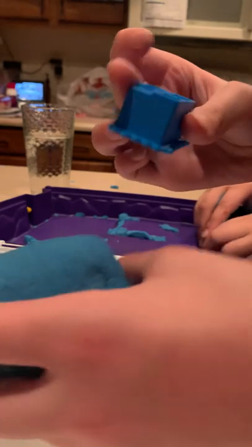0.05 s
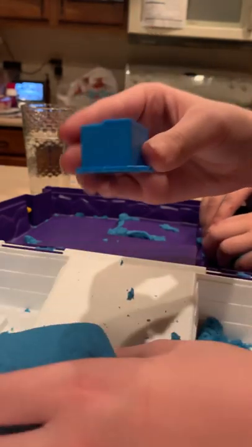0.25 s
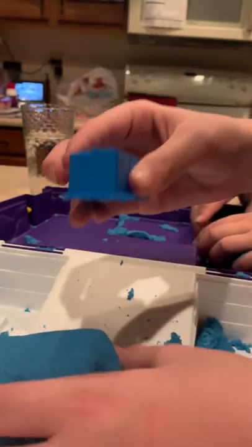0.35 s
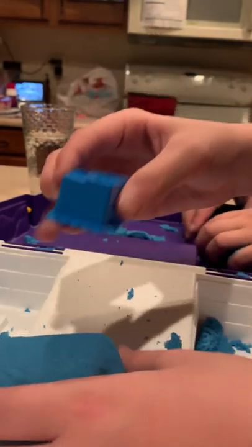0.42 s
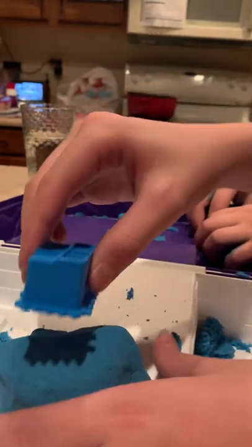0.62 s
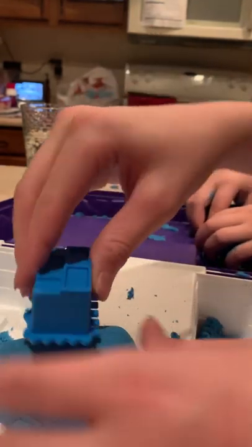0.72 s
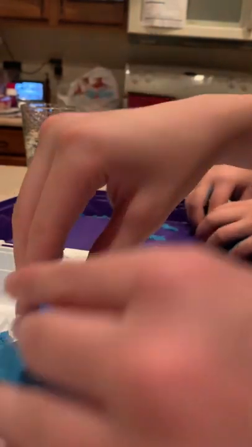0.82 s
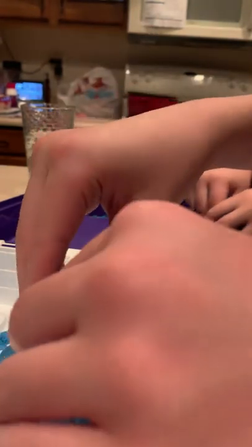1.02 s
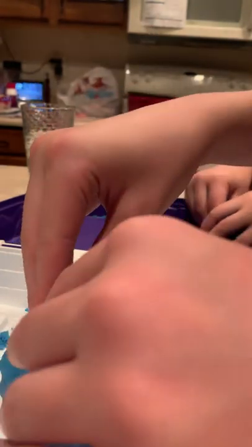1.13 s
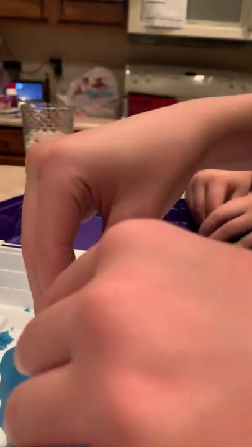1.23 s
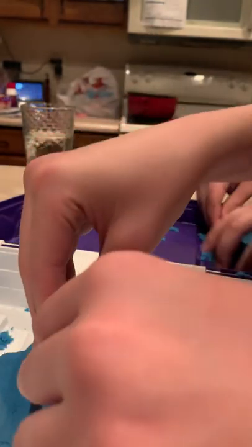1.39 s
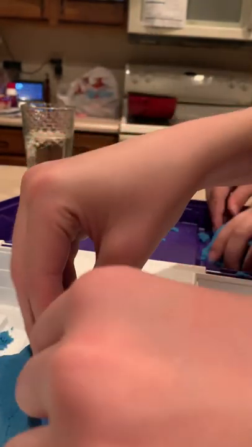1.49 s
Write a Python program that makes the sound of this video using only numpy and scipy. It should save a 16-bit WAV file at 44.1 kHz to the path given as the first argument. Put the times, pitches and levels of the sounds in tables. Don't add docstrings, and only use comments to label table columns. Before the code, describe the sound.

A hard, sharp knock on a plastic tray dominates at about 0.24 s, bright at first, then booming low through the table, with tiny rebounds and a short rattle until about 0.4 s. Before it, only a soft thump and faint sand rustle. Afterwards, quiet sand crunches and hisses, small mold taps and dry ticks near 0.5, 0.77, 0.85 and 1.33 s, rising slightly at the end, 1.55 s. Close, quiet room.

```python
import sys
import numpy as np
from scipy import signal
from scipy.fft import rfft, irfft
from scipy.io import wavfile
from scipy.ndimage import uniform_filter1d, minimum_filter1d

SR = 44100
rng = np.random.default_rng(int(sys.argv[2]) if len(sys.argv) > 2 else 0)


def dump(signal):
    limited = np.clip(np.atleast_2d(signal).T, -1, 1)
    pcm = np.round(limited * 32767).astype(np.int16)
    wavfile.write(sys.argv[1], SR, pcm)


def how_loud(loudness_db):
    steps = np.asarray(loudness_db, float) / 20
    return 10 ** steps


N = 68355


def in_time(rows):
    return np.interp(np.arange(N) / SR, *np.transpose(rows))


def at_hz(points, hz):
    f, v = np.transpose(points)
    return np.interp(np.log(hz), np.log(f), v, left=v[0], right=v[-1])


def rms_one(x):
    return x / np.sqrt(np.mean(x ** 2) + 1e-20)


def white():
    return rng.standard_normal(N)


def drift(rate_hz):
    r = np.exp(-2 * np.pi * rate_hz / SR)
    wander = signal.lfilter([1], [1, -2 * r, r * r], rng.standard_normal(N + SR))
    return rms_one(wander[SR:])


def ring(push, hz, t60):
    r = how_loud(-60 / (t60 * SR))
    w = 2 * np.pi * hz / SR
    return signal.lfilter([0, np.sin(w)], [1, -2 * r * np.cos(w), r * r], push + 1e-18)


def click_at(s, db):
    click = np.zeros(N)
    click[int(s * SR)] = how_loud(db)
    return click


def grit():
    grains_per_s, spread_db = 6800, 2
    sizes = how_loud(spread_db * np.minimum(rng.exponential(1, N), 5))
    hits = rng.random(N) < grains_per_s / SR
    return rms_one(white() * (0.15 + sizes * hits))


def bands(colour, patchy_db, source, t60=None):
    # f/Hz, likeness 0-1
    likeness = [(100, .99), (400, .9), (860, .6), (1600, .85), (4000, .93), (15000, .97)]
    tail_start_s, tail_rise_s = 0.2473, 0.0017
    age = np.maximum(np.arange(N) / SR - tail_start_s, 0)
    edges = 22 * 2 ** np.arange(0, 9.6, .5)
    together = drift(9)
    draws = np.array([[source() for _ in range(3)] for _ in range(2)])
    out = 0
    for k, (low, high) in enumerate(zip(edges, edges[1:])):
        hz = np.sqrt(low * high)
        steep = -18 * abs(np.log2(hz / np.clip(hz, colour[0][0], colour[-1][0])))
        flicker = patchy_db * (.7 * together + drift(22))
        gain = how_loud(at_hz(colour, hz) + steep + flicker)
        if t60:
            gain = gain * how_loud(-60 * age / at_hz(t60, hz)) * (1 - np.exp(-age / tail_rise_s))
        band = signal.butter(2, [low, high], "band", fs=SR, output="sos")
        shared, *own = signal.sosfilt(band, draws[k % 2])
        alike = np.clip(at_hz(likeness, hz), 0, 1)
        out = out + gain * (np.sqrt(alike) * shared + np.sqrt(1 - alike) * np.array(own))
    if t60:
        return out / np.sqrt(np.max(uniform_filter1d(out[0] ** 2, size=900)))
    return rms_one(out)


def tray(x):
    # f/Hz, level/dB, t60/s
    tray_modes = [(335, -1, 0.01), (450, 4, 0.035), (662, 4, 0.024), (745, 5, 0.03), (1189.5, 2.5, 0.039),
                  (1300, -5, 0.0097), (1600, -18, 0.09), (1855, -7.5, 0.06), (2710, -21.5, 0.048),
                  (3390, -14.5, 0.045), (4660, -4, 0.045)]
    direct_db = -4
    resonant = 0
    for k, (hz, db, t60) in enumerate(tray_modes):
        build_up = t60 * SR / np.log(1000) / 2
        resonant = resonant + how_loud(db) * ring(x, hz, t60) / build_up * (-1) ** k
    return rms_one(how_loud(direct_db) * x + 1.5 * resonant)


def room_floor():
    noise = signal.lfilter([1], [1, -.93], rng.standard_normal((2, N)))
    return how_loud(-82.5) * rms_one(noise)


def chatter(rows):
    out, t = np.zeros(N), np.arange(N) / SR
    for s, db, hz, chatter_s, cycles in rows:
        age = np.maximum(t - s, 0) / chatter_s
        swell = np.clip(age * np.exp(1 - 2 * age), 0, 1) * (age < 3)
        hits = rng.random(N) < (4000 + hz) / SR
        clicks = white() * hits * swell
        tone = ring(ring(clicks, hz, cycles / hz), hz, 2.9 / hz)
        out += how_loud(db) * tone / np.abs(tone).max()
    return out


def thuds():
    # t/s, level/dB, f/Hz, push/s
    weight_shifts = [(0, -38.5, 118, 0.014), (.17, -51, 93, 0.013), (0.469, -47, 98, 0.0096),
                     (0.671, -52, 58.1, 0.023), (0.866, -48, 60.9, 0.025), (0.919, -45, 117, .02),
                     (.96, -58, 50.5, 0.02), (1.097, -50, 59.4, 0.011), (1.474, -46, 108, 0.025),
                     (1.51, -52, 121, 0.025), (.54, -55, 57.6, 0.0099)]
    return chatter([(*row, 12) for row in weight_shifts])


def taps():
    # t/s, level/dB, f/Hz, chatter/s, ring/cycles
    small_taps = [(0, -36.5, 450, 0.0071, 2.3), (0.224, -20, 420, 0.017, 4.5),
                  (0.429, -41.5, 430, 0.006, 12), (.452, -30.5, 1900, 0.0033, 1.3),
                  (0.483, -39, 2710, 0.0057, 22), (.486, -49, 6400, .006, 1.2),
                  (.525, -34, 704, 0.0041, 10), (0.535, -38.5, 800, 0.0021, 13),
                  (0.769, -43, 6500, 0.00224, 6), (0.808, -41, 1600, 0.0058, 28),
                  (0.849, -39.5, 1284, 0.0089, 1.8), (0.852, -36.5, 307.5, 0.015, 4),
                  (0.915, -33, 1300, 0.0073, 1.7), (0.941, -40, 1850, 0.019, 9.3),
                  (1.065, -43.5, 680, 0.0175, 6.5), (1.329, -37, 4970, 0.0055, 0.84),
                  (1.36, -46, 2050, 0.013, 9.1), (1.522, -34.5, 3510, 0.044, 2.3)]
    return chatter(small_taps)


def rings():
    # t/s, level/dB, f/Hz, swell t60/s, t60/s
    soft_contacts = [(.262, -18, 450, 0.043, 0.06), (.27, -35.5, 296.3, 0.12, .3),
                     (.35, -35, 291.7, 0.064, 0.074), (.36, -37.5, 450, 0.085, 0.085),
                     (.34, -49, 830, 0.14, 0.14), (.325, -43, 1069, 0.05, .08),
                     (.524, -46, 1680, .01, 0.025), (.768, -48, 1440, 0.0045, .012),
                     (.769, -41.5, 431.5, 0.01, 0.048), (.81, -45.5, 551, 0.016, 0.025),
                     (.859, -42.5, 295, 0.025, 0.033), (.917, -45.5, 535, 0.012, .03),
                     (1.03, -46.5, 633, 0.028, 0.066), (1.337, -40, 200, 0.034, .05),
                     (1.339, -34.5, 342, 0.028, .05), (1.339, -35.5, 590, .015, 0.014),
                     (1.485, -46.5, 420, 0.025, 0.048), (.252, -29, 1170, 0.036, 0.08),
                     (.255, -32, 826, 0.043, .1), (.769, -44, 740, .006, .02),
                     (1.375, -40, 310, 0.035, 0.095), (1.475, -45, 1235, 0.035, 0.041)]
    out = np.zeros(N)
    for s, db, hz, swell, t60 in soft_contacts:
        tone = ring(ring(click_at(s, 0), hz, swell), hz, t60)
        out += how_loud(db) * tone / np.abs(tone).max()
    return out


def ticks():
    # t/s, level/dB, low edge f/Hz, length/s
    grit_ticks = [
        (.7675, -43, 1505, 0.0017),
        (.852, -52, 4000, .0015),
        (.9064, -70, 3000, 0.0024),
        (1.218, -59.5, 2500, 0.0024),
        (1.3294, -54, 3010, .002),
        (.4868, -36, 4970, 0.0036),
        (1.545, -47, 3000, 0.002),
    ]
    out, t = np.zeros(N), np.arange(N) / SR
    for s, db, low_hz, length in grit_ticks:
        burst = white() * (t > s) * np.exp(-np.maximum(t - s, 0) / length)
        out += how_loud(db) * signal.lfilter(*signal.butter(1, [low_hz, 9000], "band", fs=SR), burst)
    return out


def knock():
    # t/s, level/dB, upper limit f/Hz (a harder contact is brighter)
    contacts = [
        (.2285, -33.5, 1467),
        (.2394, 3, 9000),
        (.2558, -14.5, 3000),
        (.2725, -25, 2500),
        (.289, -27, 2500),
        (.306, -26.5, 2000),
    ]
    # f/Hz, level/dB, t60/s
    wall_modes = [(329.3, -8, 0.033), (575, -12.5, 0.037), (1068, -7, 0.025), (1752, -5.5, 0.0079),
                  (3244, -4, 0.006), (5120, -7.5, 0.0016), (5975, -10.5, 0.0036), (8900, -42.5, 0.002)]
    # f/Hz, level/dB, t60/s
    table_modes = [(61.5, -15.5, 0.18), (115.2, -12, 0.19), (215, -31, 0.2), (266, -34.5, 0.2),
                   (291, -33, 0.11), (420, -27, .15), (454, -19, 0.084), (477, -30.5, 0.09),
                   (551, -26, 0.074), (752, -28.5, 0.12), (885.5, -48, .15), (1040, -26, 0.17)]
    # f/Hz, density/(dB per Hz)
    tail_colour = [(200, -4), (350, 2), (1000, -4.5), (2000, -7), (3500, -19), (8000, -27.5), (15000, -31)]
    # f/Hz, t60/s
    tail_t60 = [(150, 0.6), (500, 0.2), (1500, 0.4), (4000, 0.099), (15000, 0.25)]
    tail_db, table_lag_s, low_cut_hz = -8.5, .008, 36
    spread_s = .0022

    push = np.zeros(N)
    for s, db, cut_hz in contacts:
        push += signal.lfilter(*signal.butter(2, cut_hz, fs=SR), click_at(s, db))
    late_push = np.roll(push, int(table_lag_s * SR))
    body = np.zeros(N)
    for k, (hz, db, t60) in enumerate(wall_modes):
        body += how_loud(db) * ring(push, hz, t60) * (-1) ** k
    for hz, db, t60 in table_modes:
        body -= how_loud(db) * ring(late_push, hz, t60)
    body = signal.sosfilt(signal.butter(4, low_cut_hz, "high", fs=SR, output="sos"), body)

    hz = np.fft.rfftfreq(N, 1 / SR)
    spread = np.exp(-4j * np.pi * spread_s * np.sqrt(1000 * hz))
    tail = tray(bands(tail_colour, 3, grit, tail_t60))
    return irfft(rfft(body) * spread, N) + how_loud(tail_db) * tail / np.abs(tail).max()


def hands():
    # t/s, level/dB
    press_curve = [(0, -46), (.07, -59), (.2, -52.5), (.232, -31.5), (.3, -43), (.6, -50), (.735, -63.5),
                   (.83, -54), (.86, -49.5), (.99, -55), (1.04, -47), (1.17, -65), (1.255, -63),
                   (1.35, -44.5), (1.44, -57.5), (1.49, -45.5), (1.51, -48), (1.55, -39.5)]
    # t/s, level/dB
    slide_curve = [(0, -66.5), (.06, -77), (.145, -70), (.158, -57.5), (.3, -61.5), (.42, -69.5),
                   (.59, -55), (.65, -73), (.845, -82.5), (.855, -70.5), (.915, -61), (.935, -91),
                   (1.04, -74.5), (1.2, -92.5), (1.36, -60.5), (1.42, -82.5), (1.51, -85), (1.55, -55)]
    # t/s, level above the air edge/dB
    air_curve = [(0, -12), (.2, 5), (.62, 0.5), (.8, 11), (.9, -11.5), (1.1, 3), (1.36, -4), (1.55, -3)]
    # f/Hz, density/(dB per Hz)
    press_colour = [(150, -21.5), (350, -0.5), (700, -7), (1300, -2), (2200, -9), (3500, -17.5),
                    (6000, -27), (12000, -41.5)]
    slide_colour = [(1500, -9), (3000, 1), (4500, 5.5), (6500, -0.5), (8500, -6), (11000, -4), (15500, -8)]
    rumble_colour = [(25, -12.5), (55, -22), (80, -3), (115, -1.5), (170, -7.5), (300, -7)]
    rumble_base_db, rumble_follows, slide_db, air_edge_hz = -58.5, 0.67, 7.5, 10000

    press_db = in_time(press_curve)
    crunch = tray(bands(press_colour, 2.2, grit))
    hiss = bands(slide_colour, 1.2, grit)
    air = signal.sosfiltfilt(signal.butter(2, air_edge_hz, "high", fs=SR, output="sos"), hiss)
    hiss = hiss + (how_loud(in_time(air_curve)) - 1) * air
    rumble = bands(rumble_colour, 1.3, white)
    rumble_db = rumble_base_db + rumble_follows * (press_db - press_db.mean())
    return how_loud(press_db) * crunch + how_loud(in_time(slide_curve) + slide_db) * hiss + how_loud(rumble_db) * rumble


def scene():
    return room_floor() + thuds() + taps() + rings() + ticks() + knock() + hands()


def top_cut(x, top_hz):
    return signal.sosfilt(signal.cheby2(14, 45, top_hz, fs=SR, output="sos"), x)


def low_pass(x):
    return signal.sosfilt(signal.butter(12, 16990, fs=SR, output="sos"), x)


def record(dry):
    # f/Hz, left leads by/rad
    port_lead = [(100, -.05), (860, -.9), (1550, -.2), (2240, .9), (3700, 1.4), (4950, 3.14), (9100, 9.42),
                 (15400, 18.85)]
    sudden_times = [.768, .885, 1.33, 1.55]
    drop_share, drop_db, drop_from_hz, drop_swing = .14, -50, 4200, .7
    sharp_db, cutoff_hz = -14, 15800

    hz = np.fft.rfftfreq(N, 1 / SR)
    half_turn = .5j * np.interp(hz, *np.transpose(port_lead)) * [[1], [-1]]
    left, right = irfft(rfft(dry) * np.exp(half_turn), N)

    hz, t, pair = signal.stft(np.array([left + right, left - right]) / 2, SR, nperseg=2048)
    share = np.cos(np.interp(hz, *np.transpose(port_lead)) / 2)[:, None] ** 2
    wander = uniform_filter1d(rng.standard_normal((9, len(t))), size=3)
    swing = 1.7 * wander[(hz // 2500).astype(int)]
    limit = drop_share * (hz[:, None] / 9000) * np.exp(drop_swing * swing) * (hz[:, None] > drop_from_hz)
    weak = [share < limit, 1 - share < limit]
    mid, side = signal.istft(pair * np.where(weak, how_loud(drop_db), 1), SR)[1][:, :N]

    crack = np.abs(np.gradient(dry[0])) > how_loud(sharp_db)
    near = np.abs(np.arange(N) / SR - np.c_[sudden_times]).min(axis=0) < .006
    sharp = 1. - minimum_filter1d(1. - (crack | near), size=300)
    sharp = uniform_filter1d(sharp, size=100)
    steady_part = top_cut((1 - sharp) * [mid + side, mid - side], cutoff_hz + 200)
    sharp_part = top_cut(sharp * [left, right], cutoff_hz + 900)
    return low_pass(np.clip(steady_part + sharp_part, -.99, .99))


dry = scene()
out = record(dry)
dump(out)
```